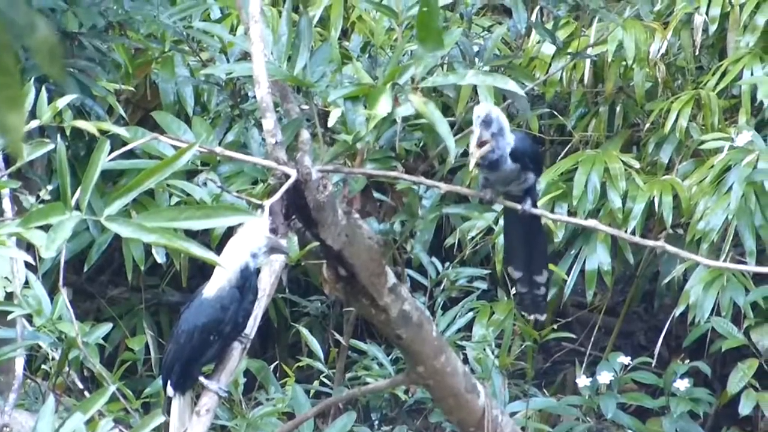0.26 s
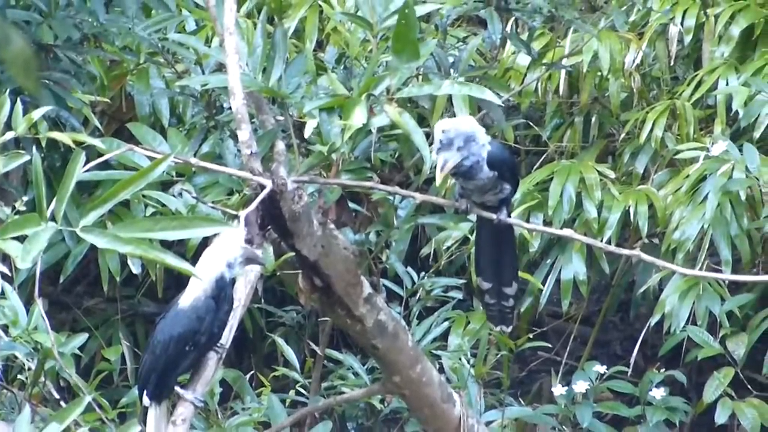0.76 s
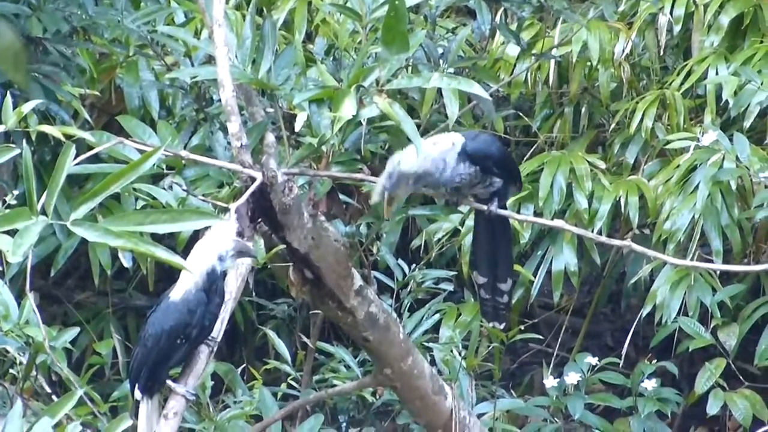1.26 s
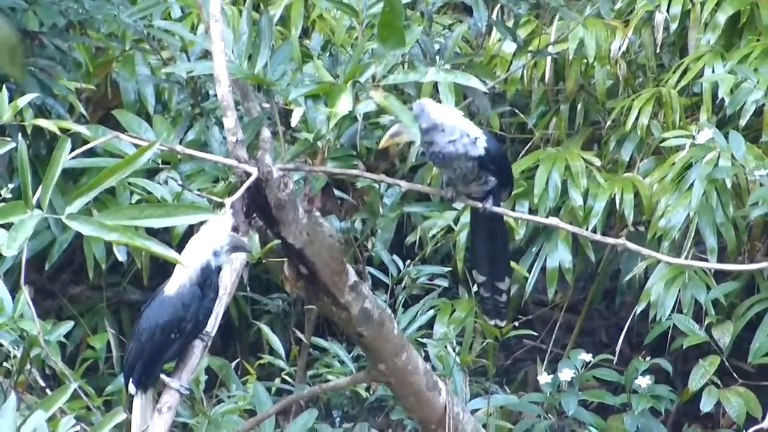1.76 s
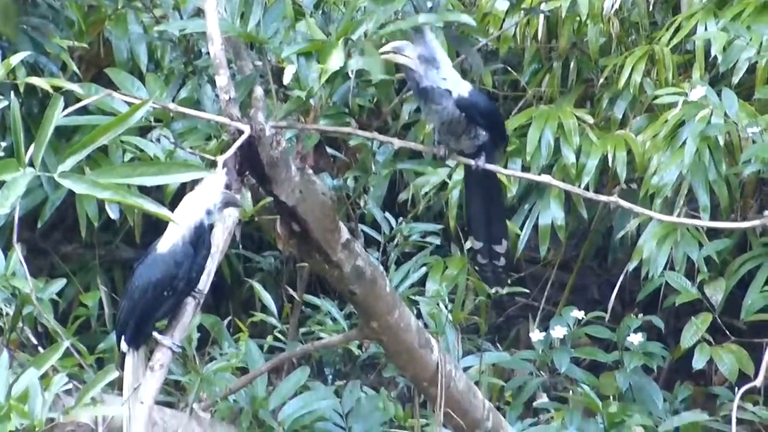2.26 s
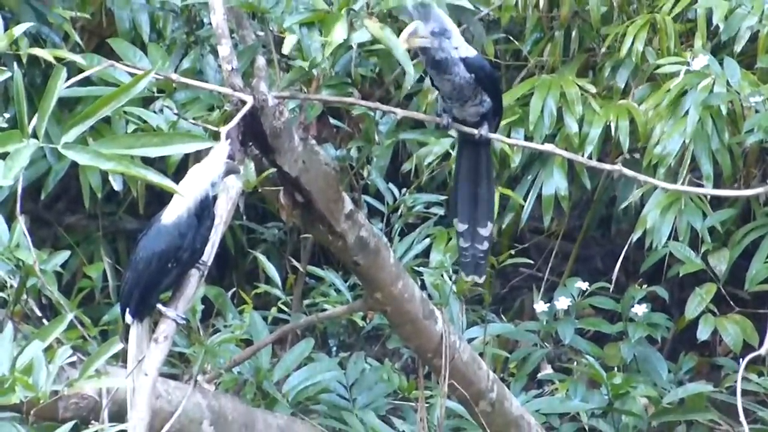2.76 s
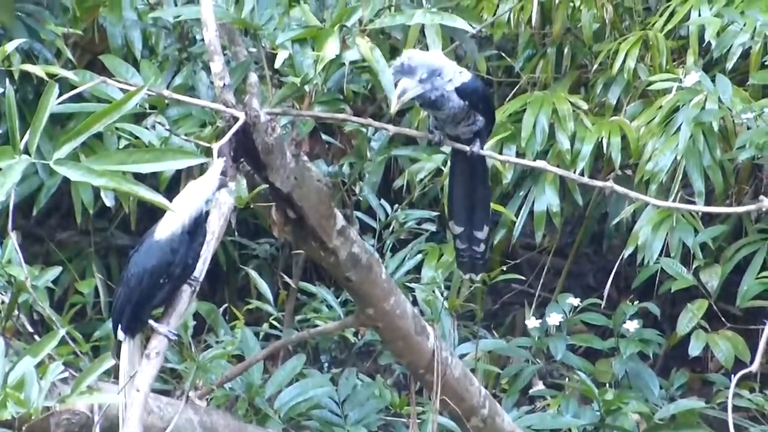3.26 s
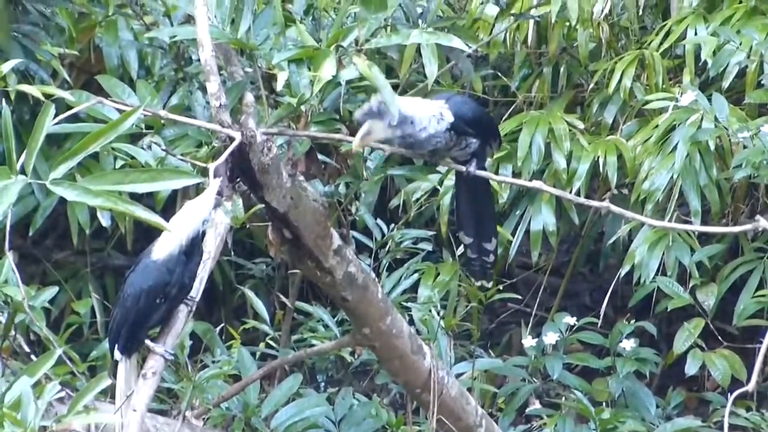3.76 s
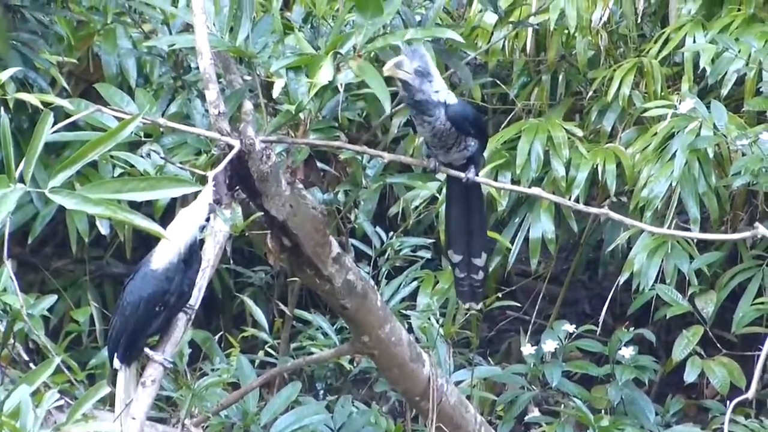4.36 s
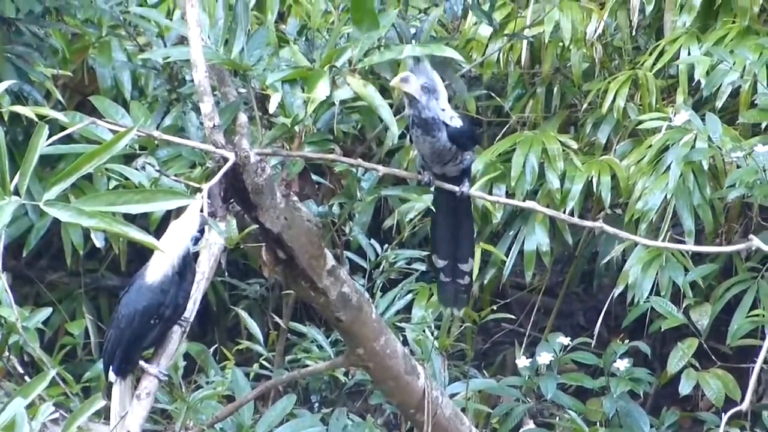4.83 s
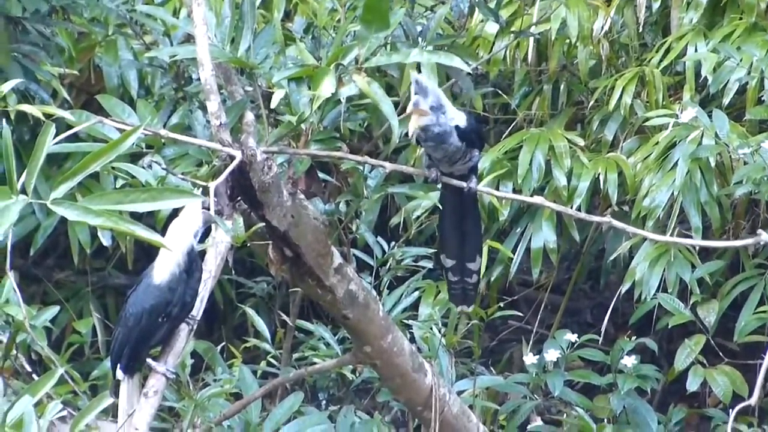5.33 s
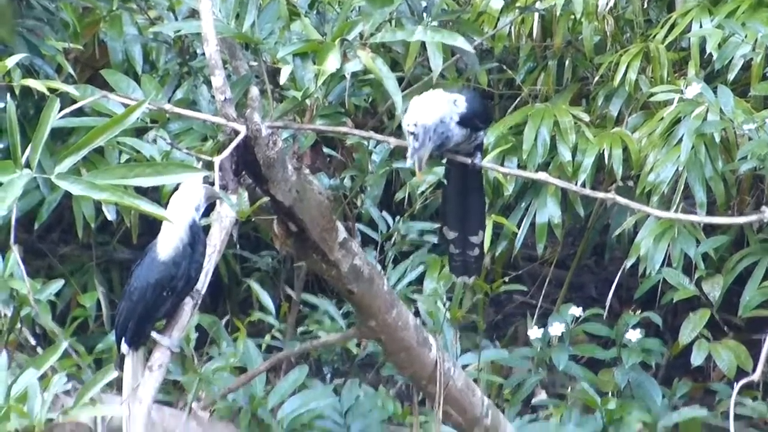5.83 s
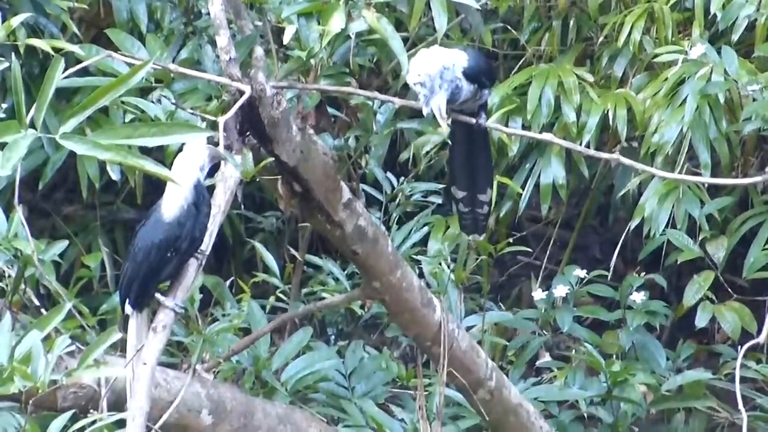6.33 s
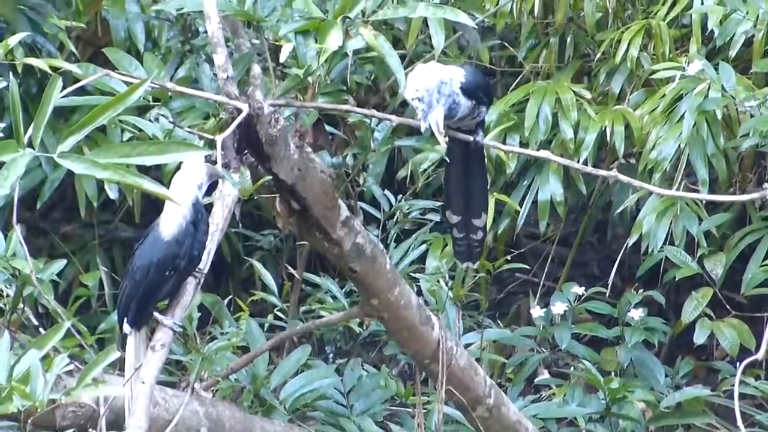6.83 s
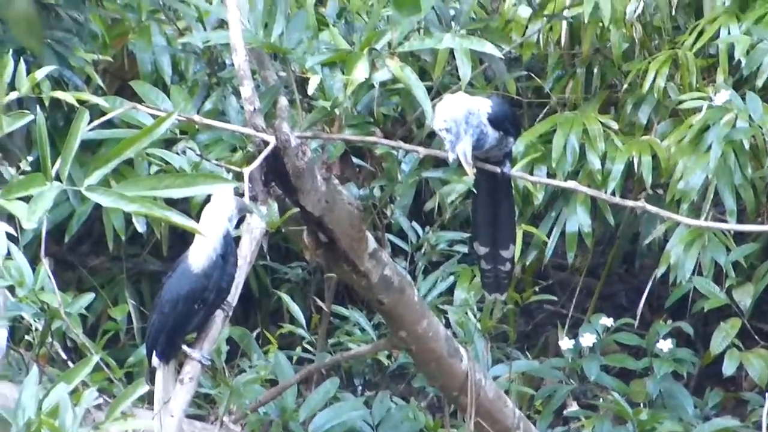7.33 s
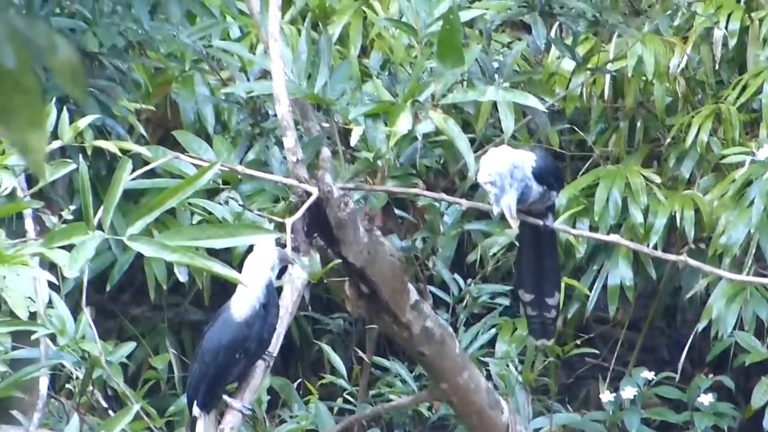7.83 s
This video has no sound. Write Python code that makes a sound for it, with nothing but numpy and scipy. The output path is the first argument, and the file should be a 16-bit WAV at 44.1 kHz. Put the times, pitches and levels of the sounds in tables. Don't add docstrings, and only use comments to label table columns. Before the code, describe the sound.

From 0 to about 8 seconds a dense, shrill insect chorus fills a humid rainforest without a break. Cicadas sizzle very high over a blurred far chorus, a near cricket holds a piercing whistle that warbles about seven times a second, and a katydid rasps in fast pulses, around nineteen strokes a second. A second cricket surges around 3 seconds, sinks towards 6, and rises again near 7. Faint falling bird chips begin at 0.3, cluster with hoarse notes around 1.2 to 1.8, and recur near 2.6, 3.7, 4.5, 5.5 and 6.4 to 7. Small round frog blips are most frequent from 2 to 5.6. The near cricket peaks around 6.4, then sags slightly in pitch. A slower, grainy cicada fades in around 5.5 and stops near 7.75. Soft leaf rustle and hollow air stay underneath, a little stronger after 3 seconds; the small microphone cuts the extreme treble.

```python
import sys
import numpy as np
from scipy import signal
from scipy.fft import rfft, irfft, next_fast_len
from scipy.io import wavfile
from scipy.ndimage import uniform_filter1d

SR = 44100
rng = np.random.default_rng(int(sys.argv[2]) if len(sys.argv) > 2 else 0)


def attenuation_scalar(level_db):
    decades = np.asarray(level_db, float) / 20
    return 10 ** decades


def generate_wav(signal):
    frames = np.transpose(np.atleast_2d(signal))
    scaled = np.clip(frames, -1, 1) * 32767
    pcm = np.round(scaled).astype(np.int16)
    wavfile.write(sys.argv[1], SR, pcm)


N = 356769
SIZE = 2 * next_fast_len(N // 2 + 2048)
TIME = np.arange(N) / SR
HZ = np.fft.rfftfreq(SIZE, 1 / SR)
FLUTTER = rng.standard_normal(N)


def level(x, db):
    return x * attenuation_scalar(db) / np.sqrt(np.mean(x ** 2))


def curves(table):
    s, *columns = np.transpose(table)
    return [np.interp(TIME, s, c) for c in columns]


def colour(table):
    hz, db = np.transpose(table)
    return attenuation_scalar(np.interp(np.log(HZ + 1), np.log(hz), db))


def resonance(hz, width):
    once = 1 / (1 + 1j * (HZ - hz) / width)
    return once * once * once


def through(x, gain):
    return irfft(rfft(x, SIZE) * gain, SIZE)[..., :N]


def walk(rate):
    held = np.repeat(rng.standard_normal(int(rate * N / SR) + 2), 8)
    slewed = uniform_filter1d(uniform_filter1d(held, size=8), size=8)
    return 1.3 * np.interp(TIME * rate * 8, np.arange(len(slewed)), slewed)


def forest(x, wet_db, t60_s, pan_db=0., apart=0.6):
    t = TIME[:SR // 2]
    fade = attenuation_scalar(-60 * t / t60_s) * (1 - np.exp(-t / 0.0019))
    shared, own = rng.standard_normal((2, SR // 2)) * fade
    tails = np.array([shared + apart * own, shared - apart * own]) / np.sqrt(np.sum(shared ** 2))
    pan = attenuation_scalar(np.array([[pan_db], [-pan_db]]) / 2)
    return through(x, 1 + attenuation_scalar(wet_db) * rfft(tails, SIZE)) * pan


def bed(table, side_gain):
    mid, side = through(rng.standard_normal((2, N)), colour(table))
    side = through(side, side_gain)
    return np.array([mid + side, mid - side])


def cicada(rate, drum_hz, width, scatter, second):
    gap_chance, loud_chance = rng.standard_normal((int(rate * N / SR), 2)).T
    gaps = 1 + scatter * (gap_chance - gap_chance.mean())
    at = np.cumsum(gaps) * SR / rate
    taps = at.astype(int)[:, None] + np.arange(-7, 9)
    offset = taps - at[:, None]
    shape = np.sinc(offset) * np.cos(offset * np.pi / 18) ** 2
    strength = attenuation_scalar(2.2 * loud_chance) * np.sign(second) ** np.arange(len(at))
    clicks = np.zeros(N + 64)
    np.add.at(clicks, taps, shape * strength[:, None])
    return level(through(clicks, resonance(drum_hz, width)), 0)


# rate/(clicks per s), drum f/Hz, width/Hz, level/dB, second drum (1 in step, -1 against)
CICADAS = [
    (327.7, 9600, 900, -40.5, 1),
    (327.7, 8900, 500, -40.5, -1),
    (336.6, 10500, 750, -43, 1),
    (301.4, 8200, 700, -47, 1),
]


def cicadas():
    scatter, pan_db = .007, -1.5
    return sum(forest(attenuation_scalar(db) * cicada(rate, hz, width, scatter, second), 0.24, 0.98, pan_db)
               for rate, hz, width, db, second in CICADAS)


# f/Hz, level/dB per Hz
FAR_WINGS = [(3590, -51), (6100, -31), (6760, -2.5), (7100, -8), (7800, -43), (8860, 0), (9530, 8),
             (10800, -9), (11500, -13), (12600, -33), (16400, -63), (22000, -120)]


def far_chorus():
    return level(bed(FAR_WINGS, attenuation_scalar(-9)), -34.5) * attenuation_scalar(np.array([[-1.1], [1.1]]))


def whistle(hz, pulse_hz, depth, rough):
    strokes = 1 + depth * np.cos(2 * np.pi * np.cumsum(pulse_hz * (1 + 0.0483 * walk(4))) / SR)
    teeth = 1 + rough * walk(120)
    return level(strokes * teeth * np.sin(2 * np.pi * np.cumsum(hz) / SR), 0)


WARBLE_HZ = 7.07

# t/s, level/dB
LEAD = [
    (0, -35),
    (3, -35.5),
    (5.4, -36.5),
    (6.4, -33),
    (7.15, -35.5),
    (8.09, -36.5),
]


def lead_cricket():
    steady_hz, sag_hz, tires_s = 5603, 28, 6.95
    pulse_db = 0.97
    turn = 2 * np.pi * WARBLE_HZ * TIME
    hz = steady_hz - sag_hz * np.clip((TIME - tires_s) / .2, 0, 1)
    bend = 11 * (np.cos(turn) - .3 * np.sin(2 * turn))
    tone = whistle(hz + bend + 5 * walk(30), 50., .15, .15)
    return forest(attenuation_scalar(curves(LEAD)[0] + pulse_db * np.cos(turn)) * tone, -12, 0.88, -3.5)


# t/s, level/dB
SECOND = [
    (0, -42),
    (.8, -44),
    (2.8, -44),
    (3.2, -36.5),
    (5.8, -43.5),
    (7.2, -38),
    (8.09, -39),
]
# start t/s, end
# t/s, from f/Hz, to f/Hz, level/dB
GLIDING = [
    (2.3, 3.1, 5310, 5340, -52),
    (3.1, 3.6, 5340, 5365, -46),
    (2.5, 3.5, 5100, 5135, -52),
    (3.6, 5.3, 5190, 5240, -54),
    (0, 6.8, 5525, 5535, -44),
    (0, 7.2, 5652, 5655, -46),
    (3.4, 5.8, 5400, 5440, -49),
    (4.5, 4.95, 5860, 5920, -58),
    (6.5, 7.6, 5060, 5085, -57),
]
# start t/s, end t/s, f/Hz, level/dB, rate/(pulses per s)
PULSING = [
    (0, 3.9, 5778, -45.5, 14.14),
    (3.9, 8.09, 5772, -43, 8.0),
    (6.7, 8.09, 5292, -49, 7.07),
    (0, 2.3, 5155, -55, 7.07),
]


def neighbour_crickets():
    glide_depth, pulse_depth = .15, .65
    hz = 5434 + 11 * TIME
    out = attenuation_scalar(curves(SECOND)[0] + 1.1 * walk(5.5)) * whistle(hz + 12 * walk(25), 45., 0.91, 0.65)
    wobble, flicker = walk(22), walk(60)
    singers = [row + (WARBLE_HZ, glide_depth) for row in map(tuple, GLIDING)]
    singers += [(start, end, hz, hz, db, rate, pulse_depth) for start, end, hz, db, rate in PULSING]
    for start, end, from_hz, to_hz, db, rate, depth in singers:
        span = np.clip(np.minimum(TIME - start + .1, end + 0.1 - TIME) / 0.2, 0, 1)
        gate = 1 - depth * (1 - np.cos(2 * np.pi * rate * TIME)) / 2
        shift = int(40 * from_hz)
        hz = np.interp(TIME, [start, end], [from_hz, to_hz]) + 4 * np.roll(wobble, shift)
        tone = np.sin(2 * np.pi * np.cumsum(hz) / SR) * (1 + .3 * np.roll(flicker, shift))
        out += attenuation_scalar(db) * span * gate ** 2 * tone
    return forest(out, -2, 0.12, -3.2, apart=0.77)


# t/s, wing strokes so far
THROB = [
    (0, .24),
    (3, 57.24),
    (5, 95.56),
    (6, 114.24),
    (8.09, 153.79),
]
# f/Hz, width/Hz, level/dB
RASP = [
    (6750, 420, 3),
    (7310, 420, 2.5),
    (13800, 1100, -14),
    (14270, 700, -11.5),
    (15640, 1500, -34),
]


def katydid():
    stroke = curves(THROB)[0] % 1
    rasps = sum(np.exp(-.5 * ((stroke - at) / .05) ** 2) for at in (0, .22, .78, 1))
    scrape = rng.standard_normal(N) * (0.46 + 1.5 * rasps * attenuation_scalar(1.5 * walk(1.4)))
    wing = sum(attenuation_scalar(db) * np.abs(resonance(hz, width)) for hz, width, db in RASP)
    return level(through(scrape, wing), 0)


# f/Hz, level/dB per Hz
AIR = [(12, -62), (20, -35.5), (211, -19.5), (307, -22.5), (490, -19.5), (695, -11), (1080, -18.5),
       (1770, -20), (3100, -26.5), (3730, -17), (4200, -19.5), (4720, -18), (5300, -4), (6890, -27),
       (11700, -120)]
# f/Hz, side minus mid level/dB
AIR_SIDE = [(60, -16), (110, -2), (200, -4.5), (380, 13), (700, 2.5), (1290, -5), (2380, -8.5), (4400, -6),
            (8120, -27), (15000, -7)]
# f/Hz, left minus right level/dB
AIR_LEAN = [(60, -6), (110, 6), (200, 3.0), (380, 2), (700, -1.5), (1290, -1.5), (2380, -0.5), (4400, -0.5),
            (8120, -4), (15000, 0.0)]
# t/s, level/dB
RUSTLE = [
    (0, -52),
    (.56, -57),
    (1.15, -54),
    (1.37, -51.5),
    (1.7, -51.5),
    (3.9, -49.5),
    (8.09, -50),
]


def air_and_leaves():
    hum_hz, hum_width_hz, hum_db = 695, 41, -6.5
    air = bed(AIR, colour(AIR_SIDE))
    air = through(air, 1 + attenuation_scalar(hum_db) * np.abs(resonance(hum_hz, hum_width_hz)))
    air *= attenuation_scalar(-53.5) / np.std(through(air.mean(axis=0), HZ < 3000))
    lean = colour(AIR_LEAN)
    air = through(air, np.array([lean ** .5, lean ** -.5])) * attenuation_scalar(0.55 + 0.069 * walk(2.47))
    leaves = through(air, 1 / (1 + (1900 / (HZ + 1)) ** 4))
    stir_db = curves(RUSTLE)[0]
    return air + leaves * (attenuation_scalar(stir_db - stir_db.mean() + 0.9 * walk(5.5)) - 1)


def add(out, s, from_hz, to_hz, ms, db, rough, grain_ms, late=0.49):
    t = np.arange(int(ms * SR / 1000)) / SR
    part = t / t[-1]
    hz = to_hz + (from_hz - to_hz) * (1 - part) ** 1.6
    start = max(int(s * SR), 0)
    grain = max(int(grain_ms * SR / 1000), 1)
    flutter = uniform_filter1d(FLUTTER[start:start + len(t)], grain) * np.sqrt(grain)
    breath = np.sqrt(1 - rough ** 2) + rough * flutter
    shape = np.abs(np.sin(np.pi * part ** late)) ** 0.87 * breath
    out[start:start + len(t)] += attenuation_scalar(db) * shape * np.sin(2 * np.pi * np.cumsum(hz) / SR)


# t/s, from f/Hz, to f/Hz, peak level/dB
CHIPS = [(.254, 4730, 4440, -31), (.398, 4340, 4000, -42), (.71, 4830, 4600, -36), (.715, 4240, 3630, -37),
         (.851, 4710, 4430, -42), (1.189, 4000, 3360, -37.5), (1.322, 3850, 3350, -38.5),
         (1.676, 3570, 3220, -46.5), (2.579, 5020, 4570, -33.5), (3.2, 4300, 3850, -49),
         (3.652, 3760, 3340, -35), (4.5, 5040, 4470, -38), (5.531, 4830, 4360, -34.5),
         (5.542, 3700, 3400, -41), (6.411, 4360, 2310, -39), (6.603, 3950, 2640, -36),
         (6.966, 3650, 2630, -37.5), (6.99, 3780, 2850, -46)]
# t/s, from f/Hz, to f/Hz, peak level/dB
SLIDES = [
    (0, 4110, 2660, -45),
    (.725, 3800, 3100, -50),
    (1.335, 3400, 2900, -48),
    (1.8, 3570, 3140, -48),
    (2.14, 4400, 3100, -53),
    (6.282, 3320, 2420, -50),
    (6.434, 4300, 3300, -47),
]
# t/s, f/Hz, peak level/dB
TICKS = [
    (.391, 4900, -42),
    (1.305, 4820, -39),
    (1.444, 4660, -36),
    (3.188, 4990, -36.5),
    (3.343, 4950, -40),
    (4.635, 4680, -37),
    (4.99, 5000, -39),
    (6.587, 4680, -40),
]
# t/s, f/Hz, length/ms, peak level/dB
CHURRS = [(.002, 3800, 30, -44), (.75, 3150, 63, -53), (1.202, 2800, 44, -46), (1.23, 3580, 74, -47),
          (1.34, 3400, 39, -48), (1.381, 3420, 31, -48), (1.42, 3485, 140, -49), (1.498, 2540, 58, -51),
          (1.708, 2200, 43, -55), (1.838, 3270, 24, -49), (3.366, 3400, 46, -49), (3.396, 2520, 44, -45.5),
          (3.678, 3490, 58, -47), (3.779, 3465, 24, -41), (3.82, 3420, 94, -51), (4.04, 3160, 18, -49),
          (5.12, 4100, 40, -51), (5.144, 3080, 18, -50), (5.16, 2290, 31, -53), (6.3, 2360, 100, -55),
          (6.468, 2310, 54, -47), (6.628, 2880, 26, -47), (6.649, 2330, 57, -47), (6.69, 2390, 140, -53.5),
          (7.84, 3000, 18, -51.5), (7.994, 2870, 28, -50.5)]
# t/s, peak level/dB
SQUAWKS = [(1.207, -48), (1.329, -53), (1.489, -52), (1.699, -51.5), (1.819, -50), (3.379, -51),
           (3.669, -45.5), (3.808, -46.5), (4.057, -54), (4.174, -52), (4.528, -50), (5.155, -50.5)]


def birds():
    chip_ms, chip_ms_per_khz = 7.8, 10
    slide_ms_per_khz, tick_ms = 33.4, 21
    sag = 0.029
    out = np.zeros(N)
    notes = [(s, a, b, chip_ms + chip_ms_per_khz * abs(a - b) / 1000, db) for s, a, b, db in CHIPS]
    notes += [(s, a, b, slide_ms_per_khz * abs(a - b) / 1000, db) for s, a, b, db in SLIDES]
    held = list(CHURRS) + [(s, hz, tick_ms, db) for s, hz, db in TICKS]
    notes += [(s, hz * (1 + sag / 2), hz * (1 - sag / 2), ms, db) for s, hz, ms, db in held]
    for s, from_hz, to_hz, ms, db in notes:
        steep = abs(from_hz - to_hz) / ms
        rough = np.clip(.8 - steep / 30, .3, 1) * min(ms / 35, 1)
        start = s + .002 - .06 * ms / 1000
        high_hz = from_hz + 0.301 * (from_hz - to_hz)
        add(out, start, high_hz, to_hz, 1.2 * ms, db, rough, 2.6)
    for s, db in SQUAWKS:
        add(out, s - .006, 2200, 2200, 61, db, 1, .35)
    return out


# t/s, peak level/dB, f/Hz
PIPS = [(.273, -50, 2110), (.427, -44, 1760), (.881, -47.5, 1740), (1.349, -55, 1690), (2.039, -47, 1820),
        (2.186, -45.5, 1626), (2.481, -44, 1610), (2.62, -45.5, 1705), (2.851, -41, 1747),
        (3.235, -38, 1573), (3.391, -44.5, 1600), (3.672, -60, 2030), (3.815, -45.5, 1443),
        (4.057, -44.5, 1650), (4.066, -53, 1154), (4.176, -42, 1710), (4.191, -48, 1156),
        (4.535, -43.5, 1820), (4.676, -38, 1782), (5.047, -43, 1573), (5.158, -44, 1725),
        (5.56, -47.5, 1740), (5.63, -58, 1420)]


def frog():
    pip_ms, rough, lead_s = 31, .45, .014
    slide_from = 1.16
    out = np.zeros(N)
    for s, db, hz in PIPS:
        add(out, s - lead_s, slide_from * hz, .97 * hz, pip_ms, db + 2.5, rough, 2.2, late=1.64)
    return out


def late_cicada():
    start_s, end_s = 5.5, 7.75
    clicks_per_s, drum_hz, width_hz = 112.9, 7840, 260
    span = np.clip(np.minimum((TIME - start_s) / .4 + .5, (end_s - TIME) / .1 + .5), 0, 1)
    return attenuation_scalar(-47) * span * cicada(clicks_per_s, drum_hz, width_hz, 0.01196, 1)


def scene():
    swell_db = .13 * (TIME - TIME.mean())
    out = attenuation_scalar(swell_db + 0.13 * walk(6)) * (cicadas() + far_chorus())
    out += attenuation_scalar(0.43) * (lead_cricket() + neighbour_crickets())
    out += forest(attenuation_scalar(-43 + 2 * swell_db) * katydid(), -0.7, 0.39, 1.0)
    out += air_and_leaves()
    out += forest(birds() * attenuation_scalar(-0.5), -3.0, 0.65, -0.35)
    out += forest(frog() * attenuation_scalar(-1.5), -6.5, 0.49, -0.43)
    out += forest(late_cicada(), .7, 0.94, -1.3)
    return out


def top_cut(x):
    return signal.sosfilt(signal.butter(12, 15780, fs=SR, output="sos"), x)


def record(dry):
    top_hz = 15780
    treble_limit = signal.ellip(8, .2, 70, top_hz, fs=SR, output="sos")
    mix = signal.sosfilt(treble_limit, dry)
    return top_cut(mix)


dry = scene()
out = record(dry)
generate_wav(out)
```